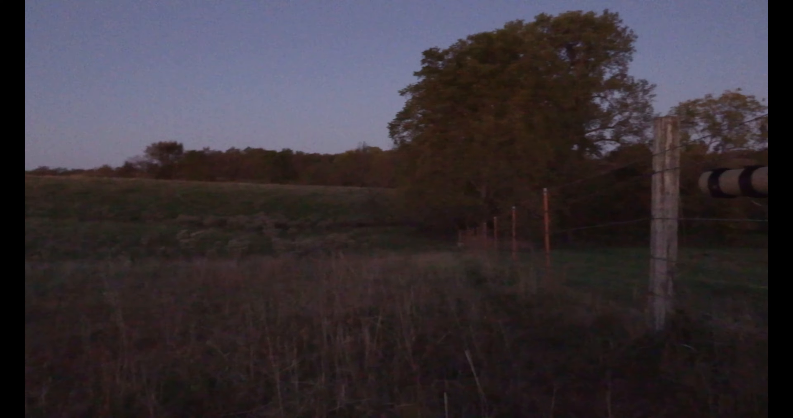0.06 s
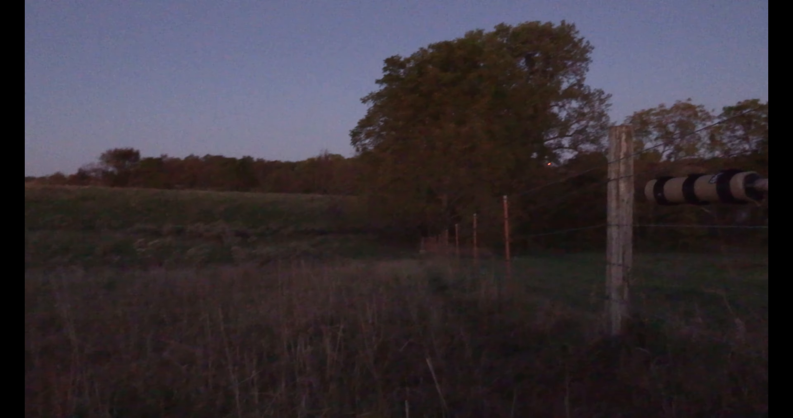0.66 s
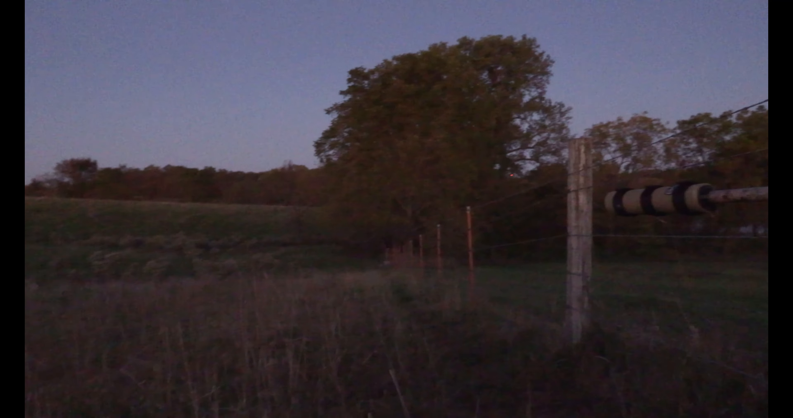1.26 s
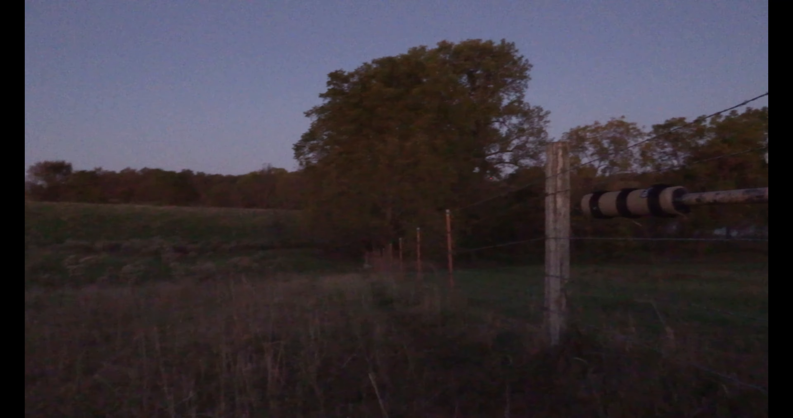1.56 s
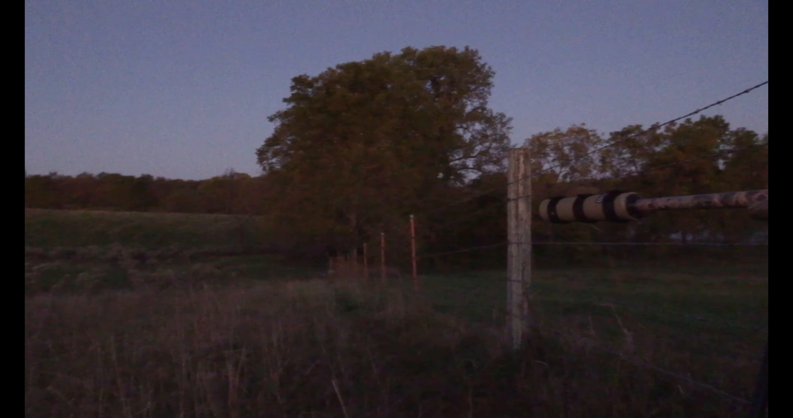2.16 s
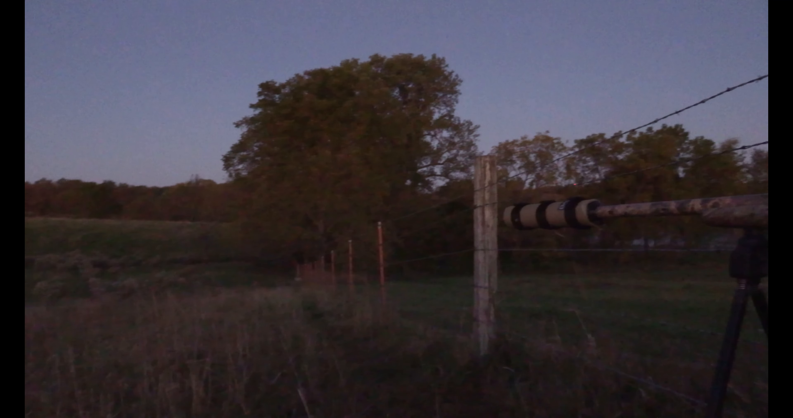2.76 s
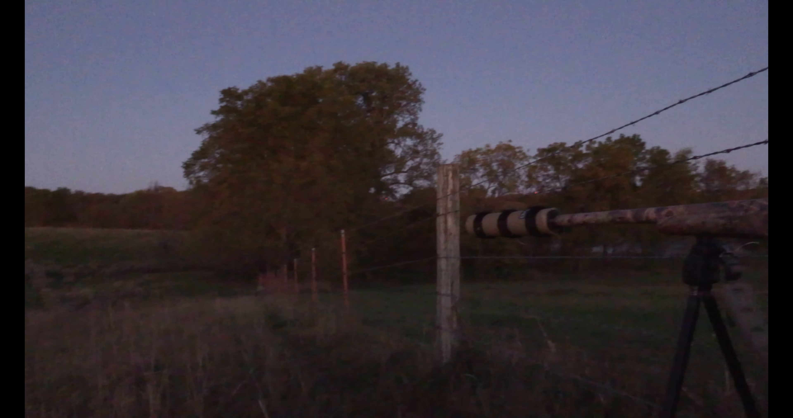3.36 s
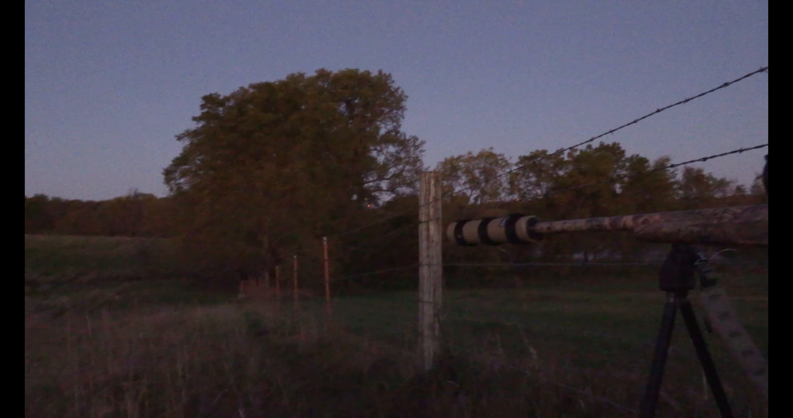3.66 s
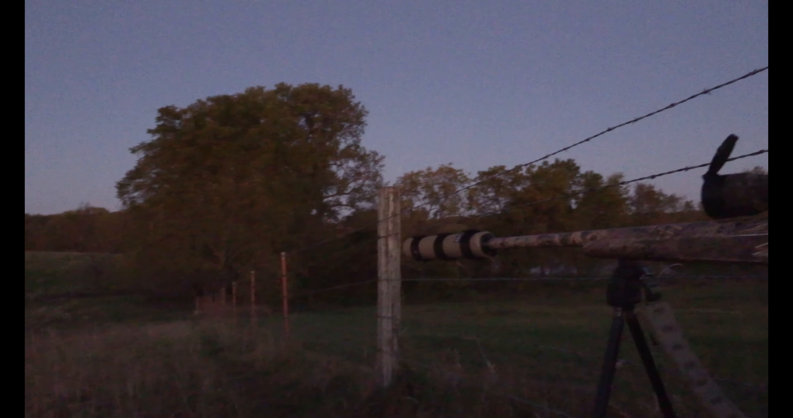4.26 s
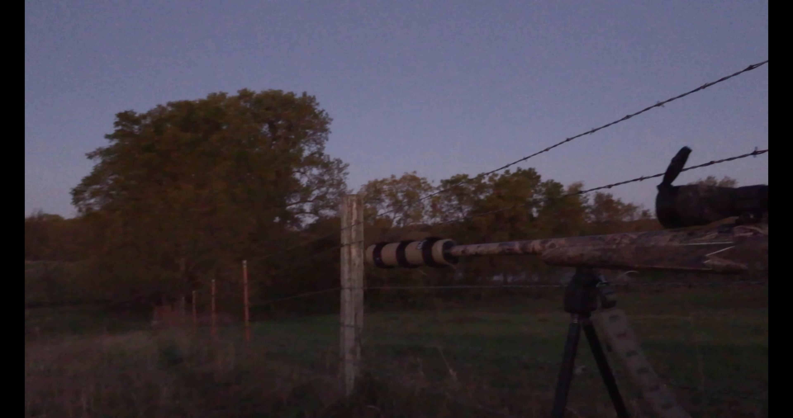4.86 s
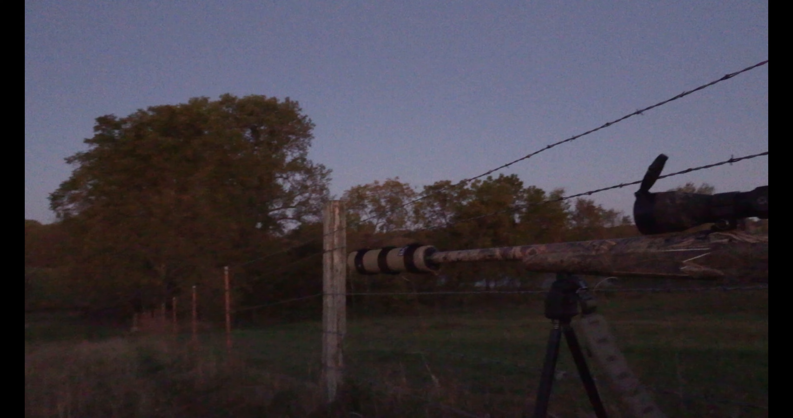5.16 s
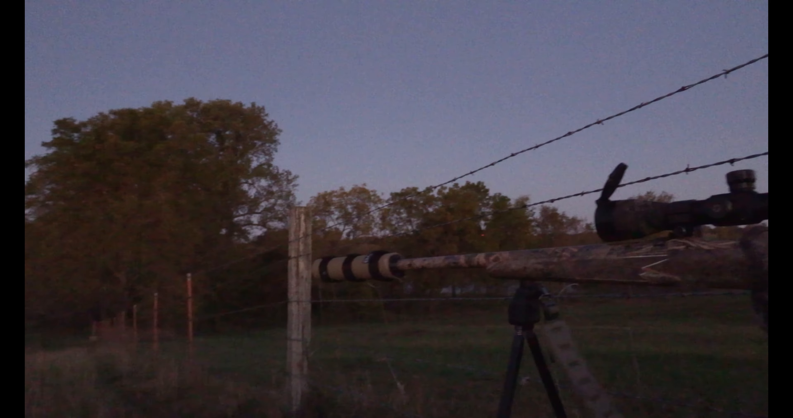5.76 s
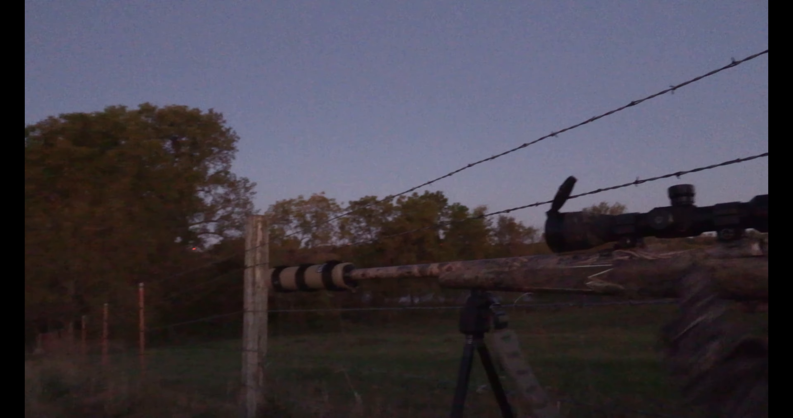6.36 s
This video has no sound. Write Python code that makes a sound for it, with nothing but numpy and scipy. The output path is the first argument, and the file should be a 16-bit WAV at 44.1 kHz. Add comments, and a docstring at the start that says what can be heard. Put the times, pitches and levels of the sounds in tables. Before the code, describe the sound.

Over quiet evening air in the countryside, several coyotes yip and whine at a distance, mostly on the left. Their high calls slide up, plunge and crack, soon joined by longer wavering howls, short whoops and faint moans that keep overlapping to the end. The ground and trees scatter the sound slightly. Near the microphone, a faint sleeve rustle and one small wind puff come early, with soft bumps now and then.

```python
"""Coyote pack at dusk

Coyotes yip, whoop, howl and whine across a field, off to the left of a camera. Most calls break out
as a harsh bark of chaotic vocal folds and clear into a gliding, whistle-like tone; yips crack as they
fall. Ground and trees scatter the voices. Up close: soft handling bumps, ticks, a sleeve, a wind puff."""
import sys
import numpy as np
from scipy import signal
from scipy.fft import rfft, irfft, next_fast_len
from scipy.io import wavfile
from scipy.ndimage import uniform_filter1d

SR = 44100
rng = np.random.default_rng(int(sys.argv[2]) if len(sys.argv) > 2 else 0)


def unload_wav(signal):
    """Save mono or channel-first audio to the path in sys.argv[1] as 16-bit WAV at rate SR, clipped to [-1, 1]."""
    wavfile.write(
        sys.argv[1],
        SR,
        np.round(np.clip(np.atleast_2d(signal).T, -1, 1) * 32767).astype(np.int16),
    )


N = 282681
T = np.arange(N) / SR

# Yips. Each row: start, rise and fall in seconds, top pitch in Hz, suddenness of the fall as a power,
# share of pitch lost in it, then in dB: tone, second harmonic at the larynx, level change over the fall,
# opening bark, closing crack, hiss against the bark.
YIPS = [(0.063, 0.2, 0.2, 1581, 3.2, 0.32, -37, -3.5, 1, -36.5, -49.5, -37),
        (0.881, 0.13, 0.13, 1575, 1.4, 0.55, -35, 3, 5, -35, -39, -25.5),
        (1.365, 0.13, 0.069, 1602, 2.3, 0.56, -31.5, 4.5, -2, -34, -37.5, -33),
        (1.913, 0.15, 0.053, 1681, 3.9, 0.35, -26, 5, -8.5, -37, -39.5, -32.5),
        (2.446, 0.13, 0.092, 1568, 1.4, 0.32, -31.5, -5, 1, -33, -39, -45),
        (3.346, 0.1, 0.061, 1490, 4.4, 0.52, -34, 2.5, -13, -36, -44.5, -39),
        (3.39, 0.09, 0.12, 1618, 2.2, 0.54, -34, 0, -2.5, -43.5, -35, -28),
        (3.856, 0.15, 0.11, 1597, 11, 0.42, -26.5, -5.5, -4.5, -33, -36.5, -43),
        (4.423, 0.165, 0.069, 1540, 4.5, 0.34, -28, -6, -3, -35.5, -38, -42.5),
        (4.834, 0.15, 0.049, 1469, 3.4, 0.36, -30.5, 1, 2, -32, -40.5, -41),
        (5.797, 0.15, 0.1, 1614, 3.9, 0.39, -26, -1, -13, -32.5, -42.5, -32),
        (6.235, 0.13, 0.15, 1648, 5.8, 0.33, -25.5, -3, -4, -37.5, -47, -22.5)]
# Barks with no tone after them. Each row: start and length in seconds, level in dB.
BARE_BARKS = [(0, 0.025, -46), (0.695, 0.13, -35.5)]
# Whoops. Each row: start, rise and fall in seconds, top pitch in Hz, share of pitch lost in the fall,
# then in dB: tone, second harmonic at the larynx, opening bark.
RISING_WHOOPS = [(2.225, 0.0585, 0.0422, 2126, 0.1, -29, -12, -38),
                 (4.239, 0.0827, 0.016, 2141, 0.17, -26.5, -7.5, -42),
                 (5.643, 0.0874, 0.036, 2144, 0.12, -31.5, -10, -44),
                 (6.109, 0.0611, 0.0246, 2146, 0.12, -26, -12.5, -40.5)]
# Howls. Each row: opening bark in dB, subharmonics of the fully slack voice in dB, a contour.
# Each contour point: time in seconds, pitch in Hz, level in dB, second harmonic at the larynx in dB.
HOWLS = [ (-49.5, -31.5, [(0.94, 2130, -40.5, -7), (1.01, 1976, -31.5, -17.5), (1.23, 1924, -31, -23.5),
         (1.38, 2089, -30.5, -2), (1.48, 1899, -40.5, -19.5), (1.535, 1498, -41.5, -19.5),
         (1.615, 1690, -33.5, -19), (1.645, 1888, -23.5, -16.5), (1.725, 2142, -29.5, 3),
         (1.8, 2003, -26.5, -25), (1.885, 1928, -25, -29), (1.92, 1690, -35, 1), (1.98, 1330, -37, -5.5),
         (2.08, 1140, -45.5, -10.5)]), (-37.5, -6, [(2.66, 1096, -50, -1), (2.72, 1742, -43.5, -15.5),
         (2.772, 2367, -38.5, -14.5), (2.787, 1790, -27.5, -6.5), (2.83, 1340, -36.5, -11),
         (2.87, 1173, -35, -16), (2.965, 1796, -37, -9), (3.06, 1577, -38, -11), (3.105, 1740, -39, -13),
         (3.135, 2037, -28, -13), (3.21, 2240, -30, -6), (3.29, 1860, -29, -28), (3.39, 1836, -31.5, -13),
         (3.47, 1511, -34.5, -16), (3.56, 1327, -40.5, -4), (3.65, 1142, -46.5, 3),
         (3.69, 1376, -32.5, -5.5), (3.725, 1840, -36.5, -16), (3.8, 1882, -42, -20),
         (3.85, 1966, -40, -28.5), (3.9, 1990, -46.5, -20)]), (-34.5, -9.5, [(2.885, 800, -47, -4.5),
         (2.96, 1055, -40.5, -11.5), (3.03, 1429, -34, 0), (3.055, 1360, -34, 3.5), (3.07, 1100, -40, 14),
         (3.12, 1023, -30.5, 10.5), (3.165, 984, -35, 14), (3.205, 661, -40.5, 11)]),
         (-58.5, -24.5, [(4.65, 1232, -33, 2), (4.685, 1631, -33, -15.5), (4.7, 2235, -32, -12),
         (4.73, 2260, -32.5, -12), (4.757, 1970, -24, -12), (4.79, 1237, -43, -7), (4.83, 1109, -36.5, -17),
         (4.935, 1994, -39, -15), (5.04, 1463, -31.5, -19.5), (5.135, 2176, -28.5, -13),
         (5.18, 2200, -32.5, -4), (5.204, 1970, -24, -5.5), (5.24, 1160, -40, -4), (5.29, 960, -51, -10.5),
         (5.34, 1044, -37.5, -16)]), (-34, -7, [(5.325, 815, -41, -14), (5.41, 1160, -39, -7),
         (5.465, 1517, -37, -1.5), (5.515, 1320, -28.5, 0.5), (5.56, 1460, -36, 1),
         (5.585, 1407, -33.5, 1.5), (5.613, 1514, -38.5, 8.5), (5.645, 1018, -36.5, 4)]), ]
# Whines, and the rising starts of yips and a whoop.
# Each row: subharmonics of the fully slack voice in dB, a contour laid out like a howl's.
LOW_GLIDES = [(-16.5, [(0.455, 955, -40, 4), (0.51, 929, -40.5, 1.5), (0.535, 875, -37, 4.5)]),
              (-14.5, [(0.46, 1184, -55, 16), (0.53, 1122, -50.5, 9), (0.57, 987, -43.5, -10.5),
              (0.62, 992.2, -44.5, -7), (0.7, 1201, -49.5, 17), (0.76, 1340, -44, 17.5)]),
              (-1.5, [(0.5, 1419, -44.5, -15), (0.56, 1315, -42, -28), (0.63, 1323, -40, -18.5),
              (0.73, 1702, -48.5, 0), (0.81, 1506, -44.5, 3), (0.86, 1172, -39, -3),
              (0.9, 1348, -39.5, -5.5)]), (-24, [(2.12, 1006, -34.5, 10), (2.17, 910, -39, 0),
              (2.21, 1062, -40, -7), (2.24, 1486, -47, 8)]), (-11.5, [(2.8, 965, -40.5, 15.5),
              (2.87, 1048, -51, 11), (2.92, 1123, -42, 10.5)]), (-11, [(0.07, 800, -49.5, -12),
              (0.17, 1230, -38, -12.5)]), (-13.5, [(4.43, 830, -37.5, -10.5), (4.55, 1280, -35, -11)])]
# Faint moans from the back of the pack. Each row: start in seconds, level in dB.
MOANS = [(1.6, -48.5), (2.171, -41.5), (2.79, -48), (4.177, -49)]
# Throat and mouth resonances, dulled by distance. Each row: frequency in Hz, relative gain in dB.
THROAT_EQ = [(500, -79), (780, -30), (1000, -15), (1280, -1.5), (1600, -1), (2030, 2), (2420, -15),
             (2780, -8.5), (3250, -26), (3600, -20.5), (3900, -32), (4220, -21), (4800, -46), (5150, -44.5),
             (5600, -34), (6200, -44.5), (8000, -66.5)]
# The camera body's shadow on the right mic. Each row: frequency in Hz, gain in dB, phase lag in radians.
BODY_SHADOW = [(600, 0, 0), (800, -1, 1.1), (1100, -4.5, 1.7), (1350, -4.5, 2.1), (1630, -10, 2.6),
               (1780, -7, 4.1), (2000, -13.5, 5.9), (2300, -8, 5.7), (2900, -3, 7.2), (3700, -3, 8.8),
               (4200, -8, 8.9)]
# Soft bumps on the camera body. Each row: start in seconds, level in dB, ring pitch in Hz.
BODY_BUMPS = [(0.165, -43, 247), (1.766, -52.5, 524.6), (2.243, -50.5, 450), (2.293, -51, 294),
              (2.795, -50, 557), (3.107, -55, 393), (3.14, -53, 310), (3.222, -52.5, 476),
              (4.039, -50.5, 494), (4.168, -54.5, 331), (4.427, -49.5, 633), (4.461, -52.5, 487),
              (4.591, -43.5, 357), (4.712, -53.5, 326)]
# Small sharp ticks. Each row: start in seconds, relative level in dB.
HANDLING_TICKS = [(0.164, -60), (2.29, -68), (3.66, -73), (3.996, -71), (4.63, -65.5)]
# Sleeve rustle. Each row: time in seconds, level in dB.
SLEEVE_LEVEL = [(0, -79), (0.23, -68.5), (0.57, -79), (0.75, -113), (1.05, -71), (1.3, -90.5), (1.6, -74.5),
                (1.9, -100)]
# Wind on the mic. Each row: time in seconds, level in dB.
WIND_LEVEL = [(0, -70.5), (0.7, -72.5), (0.92, -54.5), (1.1, -66.5), (1.35, -65), (1.55, -89.5)]
# Evening air and mic hiss, with a faint wash of the distant pack.
# Each row: frequency in Hz, relative level in dB.
BED_EQ = [(25, -31), (55, -17), (95, -3.5), (200, -9.5), (450, -10), (900, -12.5), (1400, 4.5), (2000, -4),
          (2550, -10.5), (4000, -22), (7000, -26.5), (10000, -31.5), (12500, -41)]

BARK_GLIDE_HZ, CRACK_GLIDE_HZ = (832.3, 1363), (1197, 849)
HISS_BAND_HZ = (4160, 6400)  # air past the teeth in a hard bark
OVERTONE_DB_PER_OCTAVE, SLACK_RASP_DB = -6.5, 5.5
YIP_SCOOP, YIP_WOBBLE = .45, .008  # shares of the pitch
YIP_ONSET_DB, YIP_BREAK_DB = -17.5, -3.5  # dips at the start and halfway down the plunge
WHOOP_START_HZ, MOAN_TOP_HZ = 1507, 905
NEAR_ECHO_S, NEAR_ECHO_DB = .00727, -12
TURN_DB = (3, -1)  # right-side gain from start to end, as the camera turns away from the pack
BED_DB, HIGH_CUT_HZ = -57, 13000


def yips():
    """A tone grows out of a bark, climbs unsteadily, then plunges, thins to its overtones and cracks."""
    out = 0
    for (start, rise, fall, top_hz, suddenness, drop,
         tone_db, second_db, end_db, bark_db, crack_db, hiss_db) in YIPS:
        t = np.linspace(0, rise + fall, 100)
        climbed, fallen = np.clip(t / rise, 0, 1), np.clip((t - rise) / fall, 0, 1)
        to_climb = np.cos(np.pi / 2 * climbed ** 1.1) ** 2  # lingers before it climbs
        plunge = drop * fallen ** suddenness
        hz = top_hz * np.maximum(1 - YIP_SCOOP * to_climb - plunge, .25)
        hz *= 1 + YIP_WOBBLE * wander(t, 40)
        db = tone_db + YIP_ONSET_DB * np.sqrt(to_climb) + end_db * fallen ** 2
        db += YIP_BREAK_DB * np.sin(np.pi * plunge / drop)
        squeezed_db = second_db + 33.5 * plunge ** 2
        out += voice(start + t, hz, db, squeezed_db, sub_db=-9, jitter=.022, flutter_db=2.6, rasp_db=-23)
        out += bark(start, .85 * rise, BARK_GLIDE_HZ, bark_db, hiss_db)
        out += bark(start + rise + fall - .015, .075, CRACK_GLIDE_HZ, crack_db, lateness=.75)
    return out + sum(bark(start, length, BARK_GLIDE_HZ, db) for start, length, db in BARE_BARKS)


def whoops():
    """A short bark leads into a clear tone that scoops steeply up, tips over and stops."""
    out = 0
    for start, rise, fall, top_hz, drop, tone_db, second_db, bark_db in RISING_WHOOPS:
        t = np.linspace(0, rise + fall, 100)
        to_climb = np.cos(np.pi / 2 * np.clip(t / rise, 0, 1) ** .96) ** 1.6
        fallen = np.clip((t - rise) / fall, 0, 1) ** 2
        hz = top_hz * (1 - drop * fallen) + (WHOOP_START_HZ - top_hz) * to_climb
        db = tone_db - 1.5 * to_climb - 4 * fallen
        out += voice(start + t, hz, db, second_db, sub_db=-12, jitter=.012, flutter_db=2.2, rasp_db=-24)
        out += bark(start - .071, .13, BARK_GLIDE_HZ, bark_db)
    return out


def howls():
    """Long calls that open with a bark, then waver up and down."""
    out = 0
    for bark_db, sub_db, contour in HOWLS:
        times, hz, db, second_db = np.transpose(contour)
        out += voice(times, hz, db, second_db, sub_db, jitter=.008, flutter_db=.73, rasp_db=-27)
        out += bark(times[0], .14, BARK_GLIDE_HZ, bark_db)
    return out


def low_glides():
    """Low gliding tones: whines between the yips, and the rising starts of yips and a whoop."""
    return sum(voice(*np.transpose(contour), sub_db, jitter=.007, flutter_db=2, rasp_db=-33)
               for sub_db, contour in LOW_GLIDES)


def moans():
    """Short low calls, each a shallow arch of pitch and level."""
    along = np.linspace(0, 1, 20)
    off_top = (2 * along - 1) ** 2
    hz = MOAN_TOP_HZ * (1 - .11 * off_top)
    return sum(voice(start + .14 * along, hz, db - 1.5 * off_top, second_db=-21.5,
                     sub_db=-2, jitter=.025, flutter_db=6.5, rasp_db=-25.5) for start, db in MOANS)


def voice(times, pitch_hz, db, second_db, sub_db, jitter, flutter_db, rasp_db):
    """One gliding tone: steady when high, rough as the pitch drops and the folds go slack."""
    t = np.arange(times[0], times[-1], 1 / SR)
    hz = uniform_filter1d(np.interp(t, times, pitch_hz), size=440, mode="nearest")
    second_db = np.interp(t, times, second_db + np.zeros(len(times)))
    slack = np.clip((1550 - hz) / 500, 0, 1)
    hz *= 1 + .0019 * wander(t, 70) + jitter * slack * wander(t, 500)
    fades = np.clip(np.minimum(t - t[0], t[-1] - t) / .01, 0, 1)
    envelope = fades * undb(np.interp(t, times, db) + flutter_db * wander(t, 70))
    # pressed calls with strong overtones rasp more, and so do slack ones
    rasp = undb(rasp_db + np.minimum(second_db, 4) + SLACK_RASP_DB * slack) * noise(len(t), THROAT_EQ)
    tone = larynx(hz, second_db, undb(sub_db) * slack)
    return place(times[0], envelope * (tone + rasp))


def bark(start, length, glide_hz, db, hiss_db=-35, lateness=1.085):
    """The folds flap chaotically: smeared harmonics and subharmonics over throat rasp and hiss."""
    t = np.arange(start, start + length, 1 / SR)
    along = np.linspace(0, 1, len(t))
    # a harder push is louder and wilder; lateness over 1 peaks late, under 1 early
    push = np.abs(np.sin(np.pi * along ** lateness)) ** .41
    lurch = .022 * wander(t, 450) + .04565 * wander(t, 70)
    hz = np.interp(along, [0, 1], glide_hz) * (1 + push * lurch)
    folds = larynx(hz, second_db=2, sub_gain=undb(-2 + 8.4 * wander(t, 69.8)))
    rasp = undb(-7) * push * noise(len(t), THROAT_EQ)
    shimmer = undb(2 * wander(t, 300))
    hiss = undb(hiss_db) * push * band(len(t), *HISS_BAND_HZ)
    return place(start, undb(db) * push * (folds * shimmer + rasp + hiss))


def larynx(hz, second_db, sub_gain):
    """Harmonics shaped by the throat; unequal alternate cycles put subharmonics between them."""
    t = T[:len(hz)]
    phase = 2 * np.pi * np.cumsum(hz) / SR
    wave, power = 0, 0
    for ratio in np.arange(1, 11) / 2:
        # a pressed voice lifts the second harmonic; the higher ones roll off from there
        source_db = second_db * np.clip(np.log2(ratio), 0, 1)
        source_db += OVERTONE_DB_PER_OCTAVE * np.log2(max(ratio / 2, 1))
        gain = eq_gain(THROAT_EQ, ratio * hz) * undb(source_db) * (sub_gain if ratio % 1 else 1)
        # moving air fades and smears each overtone separately
        fading = undb(4 * wander(t, 70)) if ratio > 1 else 1
        smear = .5 * max(ratio - 1, 0) * wander(t, 260)
        wave += gain * fading * np.sin(ratio * phase + smear + rng.uniform(0, 2 * np.pi))
        power += gain ** 2 / 2
    return wave / np.sqrt(power)


def field(voices):
    """The voices reach both mics with echoes off the ground and the tree line."""
    # each glide beats against its own near echo and breaks into chatter
    voices = voices + undb(NEAR_ECHO_DB) * np.interp(T - NEAR_ECHO_S, T, voices, left=0)
    left = voices + undb(-12) * scatter(voices, predelay_s=.003, t60_s=.12)
    right_ground = undb(-14.5) * scatter(voices, predelay_s=.0043, t60_s=.1)
    right = (camera_shadow(left) + right_ground) * undb(np.linspace(*TURN_DB, N))
    trees = np.array([scatter(voices, predelay_s=.03, t60_s=.55) for _ in range(2)])
    return np.array([left, right]) + undb(-24) * trees


def scatter(x, predelay_s, t60_s):
    """A cloud of weak echoes that fades in after the predelay and dies away."""
    t = T[:SR]
    echoes = rng.standard_normal(SR) * undb(-60 * t / t60_s) * np.clip(t / predelay_s - 1, 0, 1)
    return signal.fftconvolve(x, echoes / np.sqrt(np.sum(echoes ** 2)))[:N]


def camera_shadow(x):
    """Sound from the left bends round the camera body and arrives later and weaker."""
    points_hz, db, lag = np.transpose(BODY_SHADOW)
    size = next_fast_len(N + SR)
    hz = np.fft.rfftfreq(size, 1 / SR)
    shadow = undb(np.interp(hz, points_hz, db)) * np.exp(-1j * np.interp(hz, points_hz, lag))
    padded = np.pad(x, (0, SR // 10), mode="reflect", reflect_type="odd")
    return irfft(rfft(padded, size) * shadow, size)[:N]


def handling():
    """Close foley: a sleeve rustles, bumps briefly ring the camera body, small ticks snap."""
    out = undb(np.interp(T, *np.transpose(SLEEVE_LEVEL))) * band(N, 5300, 8100)
    t = T[:SR // 10]
    for start, db, hz in BODY_BUMPS:
        ring = np.sin(2 * np.pi * hz * t) * np.exp(-t / .0064)
        thud = band(len(t), 97, 700) * np.exp(-t / .0077)
        out += place(start, undb(db) * (ring + .87 * thud))
    for start, db in HANDLING_TICKS:
        out += place(start, undb(db + 5.5) * band(len(t), 1500, 9000) * np.exp(-t / .0062))
    return out


def evening_bed():
    """Air, mic hiss and a faint wash of the distant pack, nearly centred, with one puff of wind."""
    centre, left, right = (noise(N, BED_EQ) for _ in range(3))
    bed = undb(BED_DB) * (centre + .5 * np.array([left, right]))
    wind_db = np.interp(T, *np.transpose(WIND_LEVEL)) + 2 * wander(T, 25)
    return bed + undb(wind_db) * band(N, 45, 145)


def undb(db):
    """Decibels to gain."""
    return 10 ** (np.asarray(db) / 20)


def unit(x):
    """Scale to an rms of 1."""
    return x / np.sqrt(np.mean(x ** 2))


def eq_gain(curve, hz):
    """Gain of a (Hz, dB) curve at the given frequencies."""
    points_hz, db = np.transpose(curve)
    return undb(np.interp(np.log(np.maximum(hz, 1)), np.log(points_hz), db))


def noise(size, curve):
    """Noise coloured by a (Hz, dB) curve, with an rms of 1."""
    fft_size = next_fast_len(size + SR)
    gain = eq_gain(curve, np.fft.rfftfreq(fft_size, 1 / SR))
    return unit(irfft(rfft(rng.standard_normal(size), fft_size) * gain, fft_size)[:size])


def band(size, lo_hz, hi_hz):
    """Band of noise with an rms of 1."""
    sos = signal.butter(2, [lo_hz, hi_hz], "band", fs=SR, output="sos")
    return unit(signal.sosfilt(sos, rng.standard_normal(N)[:size]))


def wander(t, rate):
    """Random modulator: straight ramps between bounded values, rate of them a second."""
    values = np.clip(rng.standard_normal(8192), -2, 2)
    return np.interp((t - t[0]) * rate, np.arange(len(values)), values)


def place(start, x):
    """Lay x on a silent track at the start time."""
    track = np.zeros(N)
    i = max(int(start * SR), 0)
    track[i:i + len(x)] = x[:max(N - i, 0)]
    return track


def scene():
    """The pack far off, the camera close by, the quiet field around."""
    pack = yips() + whoops() + howls() + moans() + low_glides()
    return field(pack) + handling() + evening_bed()


def record(dry):
    """The top end is cut, and the sound ends with a 4 ms fade-out."""
    fade = np.clip((T[-1] - T) / .004, 0, 1)
    high_cut = signal.ellip(8, .2, 70, HIGH_CUT_HZ, fs=SR, output="sos")
    return signal.sosfilt(high_cut, dry * fade)


dry = scene()
out = record(dry)
unload_wav(out)
```